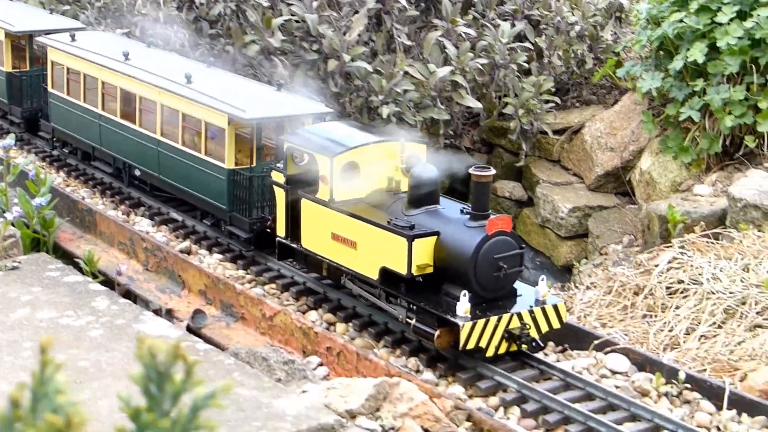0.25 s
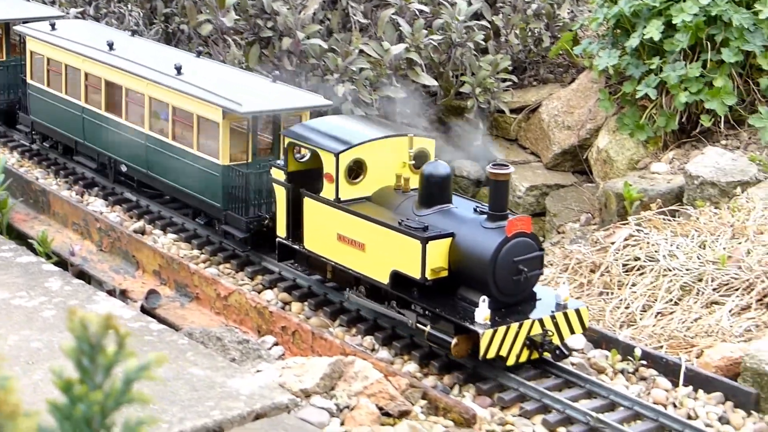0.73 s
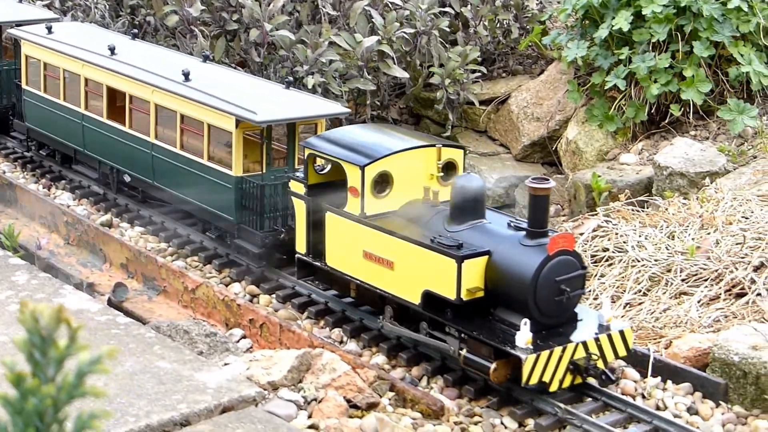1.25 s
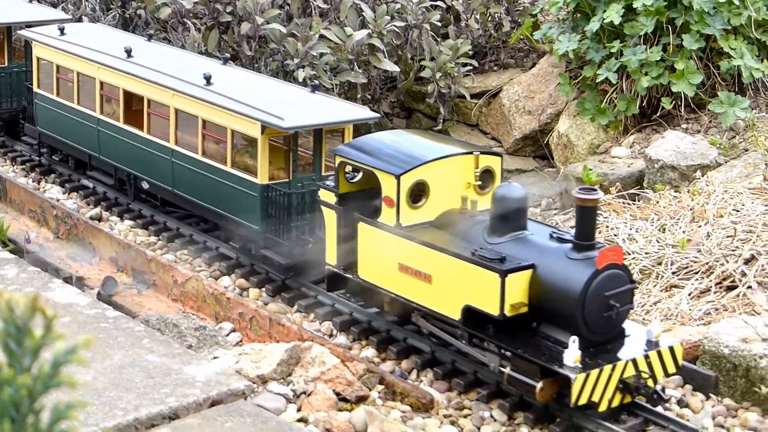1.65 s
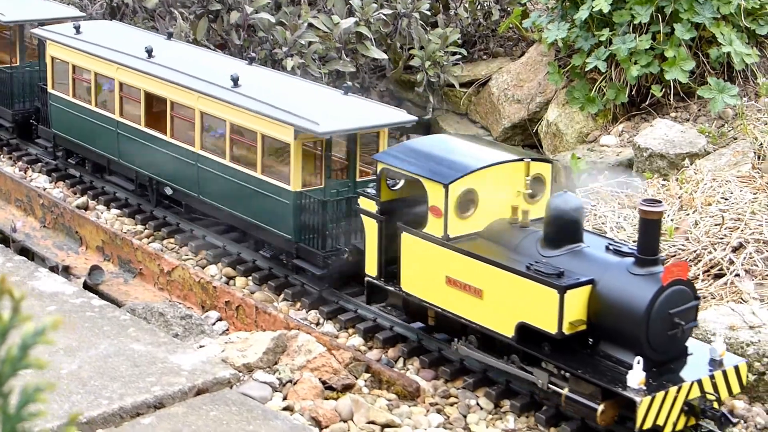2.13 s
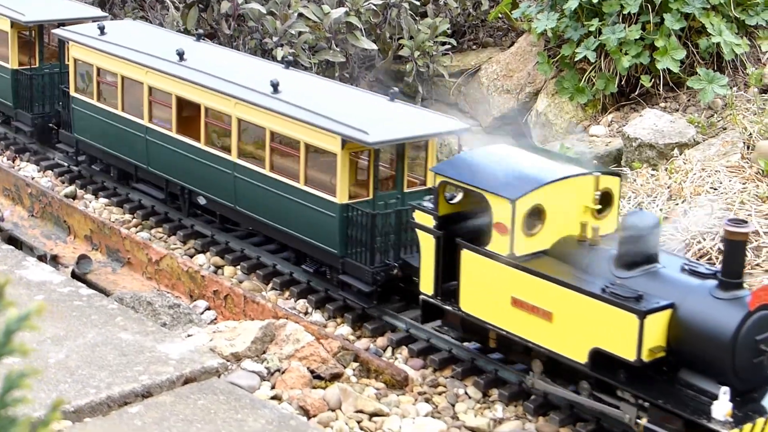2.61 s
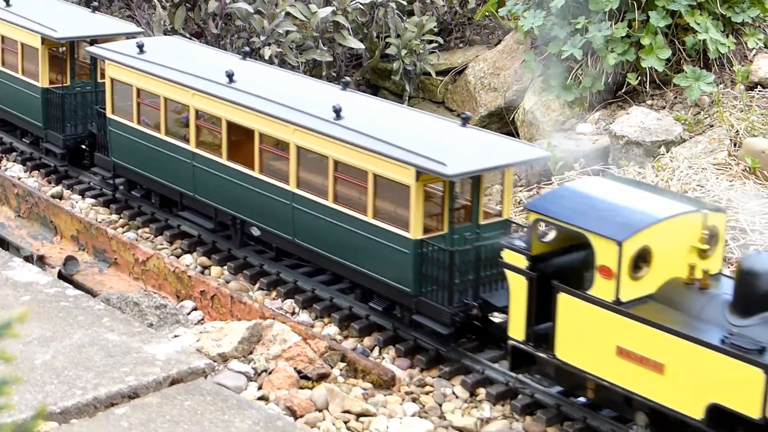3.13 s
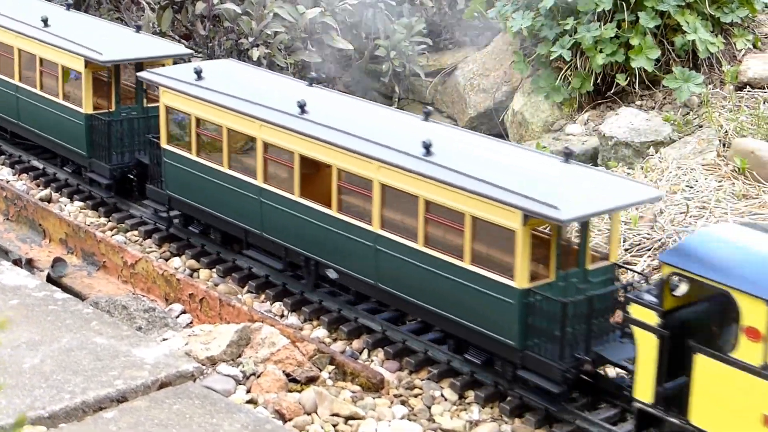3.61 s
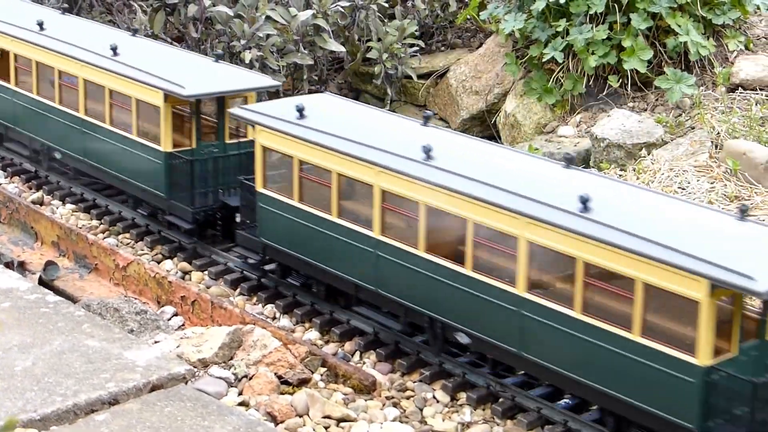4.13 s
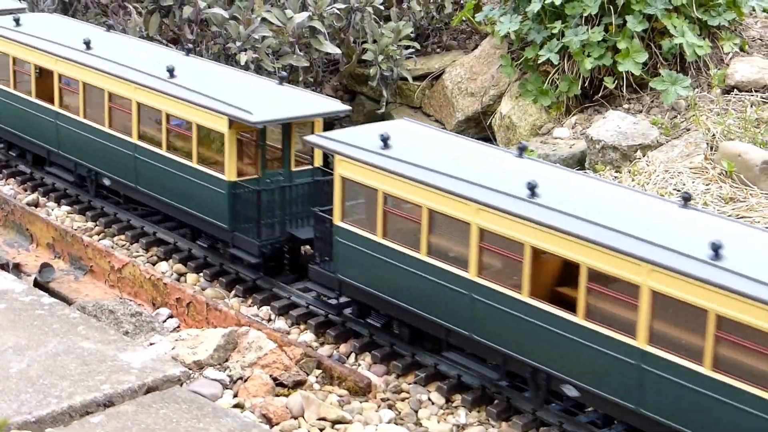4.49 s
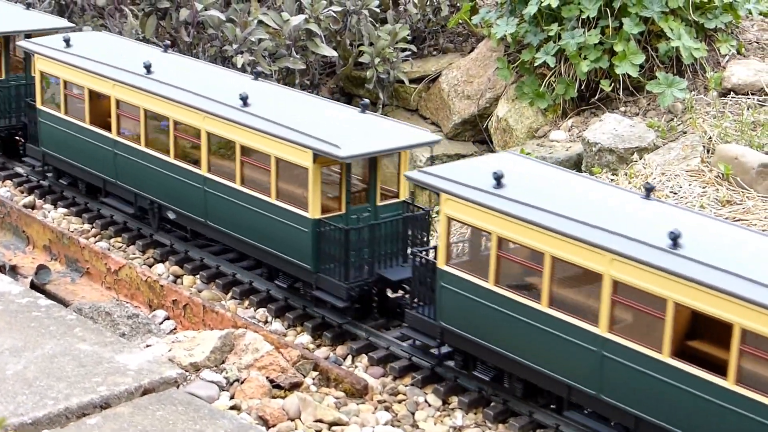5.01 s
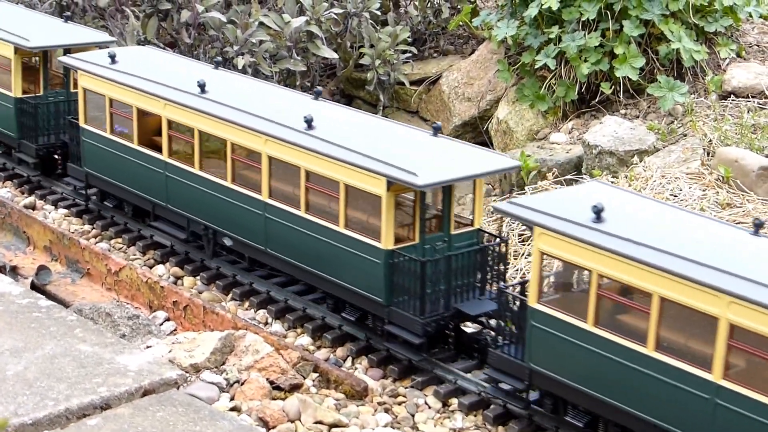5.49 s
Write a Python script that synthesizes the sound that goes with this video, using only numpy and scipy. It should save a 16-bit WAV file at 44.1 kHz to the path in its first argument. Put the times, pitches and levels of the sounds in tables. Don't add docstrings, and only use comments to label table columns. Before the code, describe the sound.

Close, dry open-air pickup of a tiny steam train. Uneven puffs of bright, pipe-coloured noise with a faint thin whistling edge sit over leaking steam; low wind buffets interrupt early. The exhaust hurries and peaks before four seconds, then turns clipped and faint. Low carriage rumble and wheel noise take over, with short, boomy knocks on rail joints, and a few stronger puffs return at the end.

```python
import sys
import numpy as np
from scipy import signal
from scipy.io import wavfile
from scipy.ndimage import uniform_filter1d, map_coordinates

SR = 44100
rng = np.random.default_rng(int(sys.argv[2]) if len(sys.argv) > 2 else 0)


def store_wav(level_fs):
    pcm = np.round(np.clip(np.atleast_2d(level_fs), -1, 1) * 32767)
    wavfile.write(sys.argv[1], SR, pcm.T.astype(np.int16))


def gain_from_db(level_db):
    decades = np.asarray(level_db, float) / 20
    return 10 ** decades


N = 253575


def rms_one(x):
    return x / np.sqrt(np.mean(x ** 2) + 1e-20)


def in_time(rows):
    times, *columns = np.transpose(rows)
    return [np.interp(np.arange(N) / SR, times, column) for column in columns]


def drift(rate_hz):
    r = np.exp(-2 * np.pi * rate_hz / SR)
    noise = rng.standard_normal(N + SR)
    settled = signal.lfilter([1], [1, -2 * r, r * r], noise)[SR:]
    return rms_one(settled)


def band(x, low_hz, high_hz, order=2):
    edges_hz = [low_hz, min(high_hz, .45 * SR)]
    return signal.sosfilt(signal.butter(order, edges_hz, "band", fs=SR, output="sos"), x)


def ringing_noise(modes, alike, flicker_db, flicker_rate_hz):
    mid, side = rng.standard_normal((2, N))
    white = np.sqrt(1 + alike) * mid + np.sqrt(1 - alike) * side * [[1], [-1]]
    out = 0
    for k, (hz, width_hz, level_db) in enumerate(modes):
        r = np.exp(-np.pi * width_hz / SR)
        zeros = [(1 - r * r) / 2, 0, (r * r - 1) / 2]
        poles = [1, -2 * r * np.cos(2 * np.pi * hz / SR), r * r]
        tone = signal.lfilter(zeros, poles, white)
        flicker = gain_from_db(level_db + flicker_db * drift(flicker_rate_hz))
        out = out + (-1) ** k * flicker * tone
    return out


def resonator(modes, alike, flicker_db, flicker_rate_hz, low_hz, high_hz, order=2):
    ringing = ringing_noise(modes, alike, flicker_db, flicker_rate_hz)
    return rms_one(band(ringing, low_hz, high_hz, order))


# t/s, leak level/dB, chimney turned away level/dB, left-right level/dB
ENGINE_PASSING = [(0, -32, -2.5, -2), (.4, -22.5, -2.5, -1.5), (.7, -30.5, -2.5, -2),
                  (1.05, -30.5, -3.5, -1.8), (1.5, -24, -4.5, -2), (2.1, -27, -6.5, -2.5),
                  (2.7, -25.5, -12, -3), (3.2, -25.5, -13.5, -4), (3.68, -27, -14, -4.5),
                  (3.92, -32, -14.5, -5.5), (4.2, -31.5, -17, -5.5), (4.7, -34.5, -14, -7.5),
                  (5.1, -38, -6.5, -9.5), (5.27, -33, -8, -8.8), (5.42, -33, -5.5, -10),
                  (5.75, -30, -8.5, -9)]


def engine():
    leak_db, body_db, pan_db = in_time(ENGINE_PASSING)
    return steam(leak_db, body_db) * gain_from_db(np.array([pan_db, -pan_db]) / 2)


# f/Hz, width f/Hz, level/dB
CHIMNEY_MODES = [(2397, 460, -0.5), (2528, 149, 8.5), (2730, 520, 2), (3330, 310, 2)]
BLAST_PIPE_MODES = [(3713, 318, 0.5), (4070, 352, 0), (4445, 414, -7), (5100, 1300, -23),
                    (3406, 240, -13.5)]
NOZZLE_MODES = [(5630, 3400, -5), (7670, 2080, -1.5), (8930, 880, 0), (9680, 370, 2.5), (10460, 620, -4.5),
                (13600, 350, -9), (14600, 1000, -20), (15300, 330, -14.5)]
# f/Hz, width f/Hz, level/dB
SCATTERED_HISS_MODES = [(2270, 1500, 6), (5000, 5200, 6), (6670, 2750, 8), (10000, 810, -7.5),
                        (12500, 1300, -4), (15100, 900, -2)]


def steam(leak_db, body_db):
    hiss_db = -35 + 0.43 * (leak_db + 29)
    bright_db = -2 + 0.46 * body_db
    power, bright = valve_flow(leak_db, hiss_db, bright_db)
    sputter = gain_from_db(1.02 * drift(22.5) + 0.34 * drift(450))

    pipe = resonator(BLAST_PIPE_MODES, 0.93, 0.96, 16, 3300, 5750)
    chimney = resonator(CHIMNEY_MODES, 0.89, 0.28, 6.7, 1880, 5900, order=3)
    nozzle = resonator(NOZZLE_MODES, 0.84, 0.53, 46, 4260, 20000)
    puff = resonator([(1390, 1800, 0)], 0.81, 0.94, 30, 760, 3180)
    jet = gain_from_db(-1.0) * pipe + gain_from_db(body_db) * chimney + gain_from_db(-20) * puff
    beats = sputter * (np.sqrt(power) * jet + np.sqrt(bright) * nozzle)

    rim = resonator([(2494, 34, 0)], 0.49, 1.0, 30, 2460, 2466)
    whistle = gain_from_db(leak_db - 14 + 1.5 * drift(0.27)) * rim
    hiss = resonator(SCATTERED_HISS_MODES, 0.61, 1.0, 12.0, 1960, 11800)
    sing = resonator([(3827, 43, 0)], 1.0, 0.61, 8.0, 3670, 3850)
    return ground_echo(beats) + gain_from_db(hiss_db - 2.0) * hiss + gain_from_db(leak_db - 10) * sing + whistle


# valve open t/s, level/dB, opening t/s, length
# t/s
EXHAUST_BEATS = [(-.018, -22.5, .022, 0.11), (0.12, -18.5, 0.037, 0.17), (.247, -16.5, 0.0088, 0.097),
                 (0.387, -20.5, 0.039, 0.13), (0.569, -16, 0.032, 0.086), (0.755, -20.5, 0.039, 0.14),
                 (0.881, -18, 0.031, .11), (1.032, -20, 0.047, 0.13), (1.234, -21.5, 0.02, 0.093),
                 (1.427, -19.5, 0.027, 0.16), (1.581, -18.5, 0.015, 0.058), (1.746, -21, .035, 0.12),
                 (1.957, -19.5, 0.043, 0.12), (2.155, -16.5, 0.017, 0.11), (2.297, -17, 0.025, 0.098),
                 (2.447, -16, 0.063, 0.096), (2.628, -16, 0.043, 0.064), (2.788, -16, .016, .11),
                 (2.894, -15, .022, 0.078), (3.006, -16, 0.029, 0.1), (3.147, -15, 0.051, 0.082),
                 (3.286, -16.5, 0.022, 0.086), (3.369, -15, 0.022, .062), (3.466, -14, 0.024, 0.047),
                 (3.585, -14, 0.04, 0.049), (3.693, -15, 0.032, 0.085), (3.771, -11, 0.022, 0.031),
                 (3.851, -16, .012, 0.068), (3.949, -15, .014, 0.054), (4.042, -17.5, .013, 0.029),
                 (4.106, -17.5, 0.042, .028), (4.187, -19, .008, 0.034), (4.286, -18.5, 0.018, 0.026),
                 (4.392, -20.5, .016, .038), (4.468, -22.5, .024, 0.033), (4.561, -22, 0.022, 0.03),
                 (4.682, -24.5, .005, .033), (4.816, -22.5, 0.022, .035), (4.91, -26, 0.031, 0.023),
                 (5.023, -27.5, 0.016, .031), (5.179, -26, 0.046, .043), (5.283, -34.5, .013, 0.031),
                 (5.351, -23, 0.017, 0.06), (5.47, -21.5, .031, 0.084), (5.601, -20, 0.025, 0.11)]


def valve_flow(leak_db, hiss_db, bright_db):
    t = np.arange(N) / SR
    power, bright = gain_from_db(2 * (leak_db - 6.0)), gain_from_db(2 * (hiss_db - 9.0))
    for start, level_db, rise, length in EXHAUST_BEATS:
        hold = 0.19 * length
        fall_db_per_s = 10 / (length - hold)
        start = start - .7 * rise
        near = slice(max(round(start * SR), 0), round((start + .5) * SR))
        since = t[near] - start
        opening = np.clip(since / rise, 0, 1) ** 3
        shut = np.clip(since - rise - hold, 0, None)
        beat = gain_from_db(2 * (level_db - fall_db_per_s * shut))
        tail = gain_from_db(2 * (level_db - 17.0 - 85 * shut))
        power[near] += opening * (beat + tail)
        bright[near] += opening * gain_from_db(2 * (level_db + bright_db[near] - 1.19 * fall_db_per_s * shut))
    return power, bright


# t/s, lag t/ms, strength (0-1, no echo at 0.5)
GROUND_PATH = [
    (0, .4, .75),
    (.4, .415, .85),
    (1.2, .425, .92),
    (1.9, .46, .88),
    (2.5, .49, .85),
    (3.2, .505, .7),
    (3.6, .51, .5),
    (5.75, .51, .5),
]


def ground_echo(x):
    lag_ms, strength = in_time(GROUND_PATH)
    out, again = x, -.5
    for bounce in range(1, 4):
        where = [np.arange(N) - bounce * lag_ms * SR / 1000]
        late = np.array([map_coordinates(side, where, order=2) for side in x])
        out = out + (strength + again) * again ** (bounce - 1) * late
    return out


# t/s, rumble level/dB, wheels on rail level/dB
CARRIAGES_PASSING = [
    (0, -42.5, -40),
    (1, -41.5, -37),
    (2.3, -43.5, -46),
    (3.5, -38, -59),
    (4.26, -35, -40),
    (4.95, -37.5, -37),
    (5.2, -41, -43),
    (5.45, -39, -34),
    (5.75, -34, -38),
]
# f/Hz, width f/Hz, level/dB
FLUE_MODES = [(818.7, 63, 6), (1310, 150, -5), (720, 1250, -9)]
# f/Hz, width f/Hz, level/dB
CAR_BODY_MODES = [(270, 194, -5), (405, 162, -1), (529, 206, -6.5), (153, 76, -14)]


def rolling():
    rumble_db, wheels_db = in_time(CARRIAGES_PASSING)
    burner_db = -35.5 + 0.05 * drift(12)
    rail_db = wheels_db + drift(2.9)
    burner = resonator(FLUE_MODES, 0.9, 0.72, 24, 546, 1250)
    rumble = resonator(CAR_BODY_MODES, 0.86, 2.03, 32.0, 95, 1200)
    rail = resonator([(1087, 350, 0.4), (1367, 310, -2.4)], 0.56, 2.6, 26, 530, 1500)
    return gain_from_db(burner_db) * burner + gain_from_db(rumble_db + 2.5) * rumble + gain_from_db(rail_db - 2.5) * rail


# t/s, level/dB, boom f/Hz, rattle level/dB, decay t60/s
JOINT_KNOCKS = [
    (3.621, -33, 380, 3, 0.48),
    (3.951, -44, 403, 2, 0.41),
    (4.166, -24, 398, -22, 0.45),
    (4.332, -18.5, 416, -22, 0.16),
    (4.48, -28, 415, -22, 0.34),
    (5.565, -18.5, 405, -14, 0.19),
    (5.715, -22, 420, -14, 0.33),
]


def joints():
    t = np.arange(N) / SR
    rattle = rms_one(band(rng.standard_normal((2, N)), 370, 650))
    out = np.zeros((2, N))
    for start, level_db, hz, rattle_db, t60 in JOINT_KNOCKS:
        since = np.clip(t - start, 0, None)
        envelope = gain_from_db(level_db - 60 * since / t60) * (1 - np.exp(-since / 0.011))
        boom = np.sin(2 * np.pi * hz * since)
        out += envelope * (boom + gain_from_db(rattle_db) * rattle)
    return out


# t/s, length t/s, level/dB
PORT_GUSTS = [(0.03, 0.19, -39), (0.208, 0.072, -34), (0.582, 0.062, -26.5), (.66, 0.067, -26.5),
              (0.784, 0.15, -32.5), (.93, 0.032, -29), (0.981, 0.106, -36), (1.627, 0.082, -36),
              (1.716, 0.14, -39.5), (2.149, 0.323, -39.5), (2.624, 0.09, -40), (3.007, 0.16, -43),
              (5.235, 0.11, -42)]


def wind():
    t = np.arange(N) / SR
    white = rng.standard_normal((2, N)) + 1.65 * rng.standard_normal(N)
    gust_db = -49.5 - 1.5 * t
    for start, length, level_db in PORT_GUSTS:
        rise_db = 700 * np.clip(start - t, 0, None)
        fall_db = 900 * np.clip(t - start - length, 0, None)
        gust_db = np.maximum(gust_db, level_db - (rise_db + fall_db))
    deep, high = rms_one(band(white, 81.0, 182)), rms_one(band(white, 96, 276))
    top = rms_one(band(rng.standard_normal((2, N)), 220, 550))
    lumps_db = 2.5 * np.array([drift(25), drift(25)])
    strong = gain_from_db(1.73 * (gust_db + 34.5))
    noise = deep + strong * (high + gain_from_db(-17) * top)
    return gain_from_db(gust_db + lumps_db) * noise + buffets(top)


# t/s, level/dB, left-right level/dB, f/Hz
EDDY_BUFFETS = [(.176, -33, 6, 185), (.207, -28, 5, 176), (.251, -28, 13, 208), (0.276, -30.5, 15, 279),
                (0.571, -20, 9, 208), (.613, -7.5, 7, 270), (0.652, -18.5, -18, 250),
                (0.693, -13.5, -22, 276), (.807, -23, 0.5, 169), (0.845, -20, 3, 254), (.877, -37, -7, 209),
                (0.964, -18.5, 16, 260), (0.988, -35, -16, 154), (1.014, -32, -12, 141),
                (1.053, -33, 11, 178), (1.656, -25.5, 2, 163), (1.675, -26.5, -9, 187),
                (1.757, -30.5, 2, 177), (1.821, -32.5, -6, 221), (2.136, -39, -12, 161),
                (2.333, -31, 15, 201), (2.355, -26.5, 1, 150), (2.683, -31.5, -11.5, 181),
                (4.561, -38, -14, 237), (5.249, -40, -15, 186), (5.302, -36, -19, 190)]


def buffets(top):
    t = np.arange(N) / SR
    out = np.zeros((2, N))
    turns = rng.random((len(EDDY_BUFFETS), 2))
    for (centre, level_db, pan_db, hz), (phase, apart) in zip(EDDY_BUFFETS, turns):
        length = 1.03 / hz
        near = slice(max(round((centre - 3 * length) * SR), 0), round((centre + 3 * length) * SR))
        since = t[near] - centre
        shape = np.exp(-(since / length) ** 2 * 1.07)
        port_phase = np.array([[0], [0.64 * apart - .2]])
        cycles = hz * since + phase + port_phase
        thump = np.sqrt(2) * np.sin(2 * np.pi * cycles) + gain_from_db(0.24 * (level_db - 9)) * top[:, near]
        pan = gain_from_db(np.array([[pan_db], [-pan_db]]) / 2)
        out[:, near] += gain_from_db(level_db + 3.5) * pan * shape * thump
    return out


def distant_rumble():
    return gain_from_db(-54.5) * rms_one(band(rng.standard_normal((2, N)), 30, 156))


def scene():
    return engine() + rolling() + joints() + wind() + distant_rumble()


def gain_control(x):
    bass = uniform_filter1d(np.mean(band(x, 40, 370) ** 2, axis=0), size=600)
    bass_db = 10 * np.log10(np.abs(bass) + 1e-12)
    climb_db = 21.5 * np.arange(N) / SR
    held_db = np.maximum.accumulate(bass_db + climb_db) - climb_db
    excess_db = uniform_filter1d(np.clip(held_db + 29.5, 0, None), size=200)
    return x * gain_from_db(-0.27 * excess_db)


def band_limit(x):
    return signal.sosfilt(signal.butter(12, 15800, fs=SR, output="sos"), x)


def record(dry):
    bass_cut = signal.butter(2, 110, "high", fs=SR, output="sos")
    treble_dip = signal.butter(2, (13050, 13850), "bandstop", fs=SR, output="sos")
    treble = signal.butter(2, 11000, "high", fs=SR, output="sos")
    heard = signal.sosfilt(bass_cut, gain_control(dry))
    heard = signal.sosfilt(treble_dip, heard)
    side = signal.sosfilt(treble, (heard[0] - heard[1]) / 2)
    heard = heard + 1.1 * side * [[1], [-1]]
    mix = 1.136 * np.tanh(heard / 1.262)
    return band_limit(mix)


dry = scene()
out = record(dry)
store_wav(out)
```